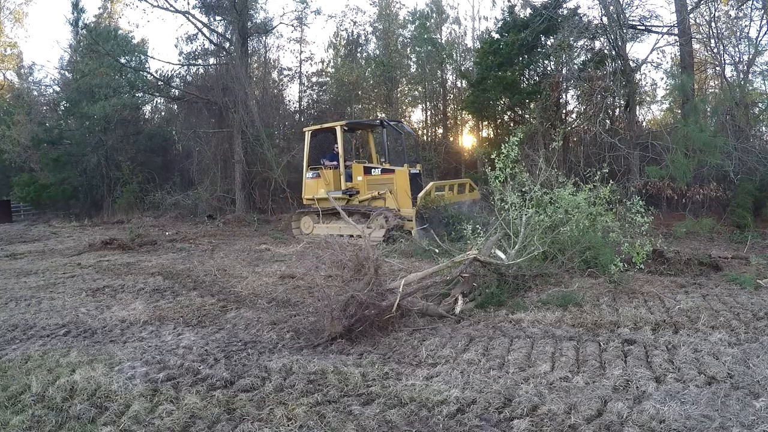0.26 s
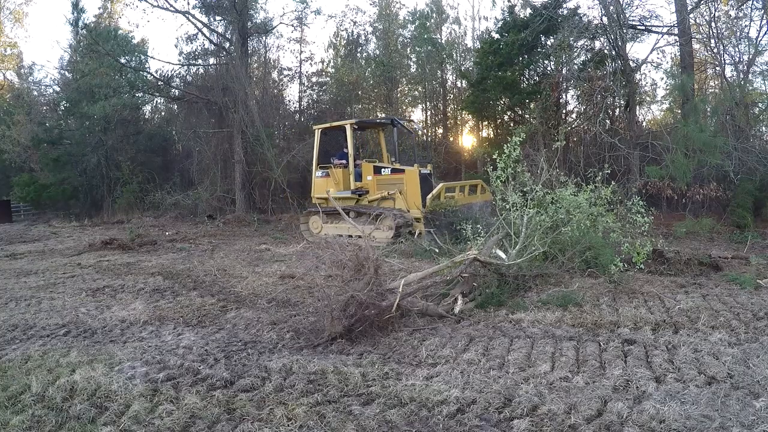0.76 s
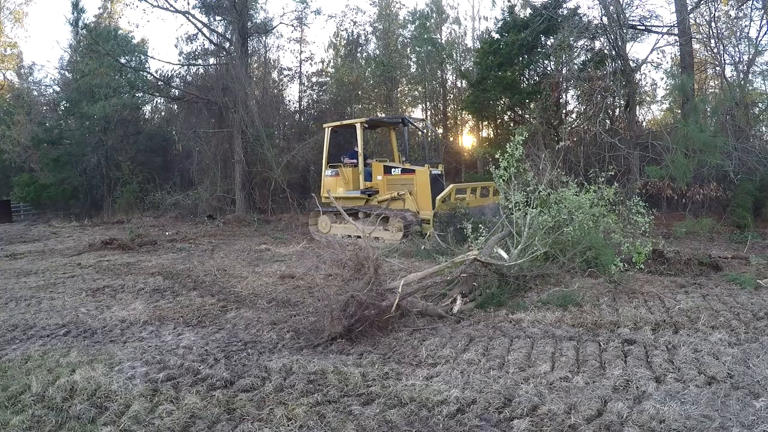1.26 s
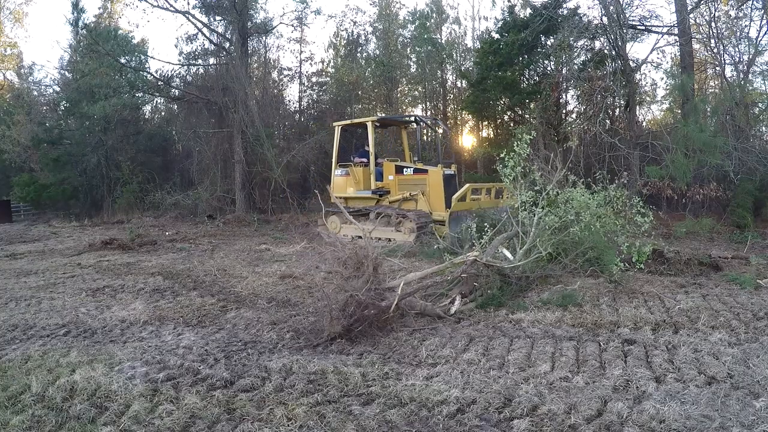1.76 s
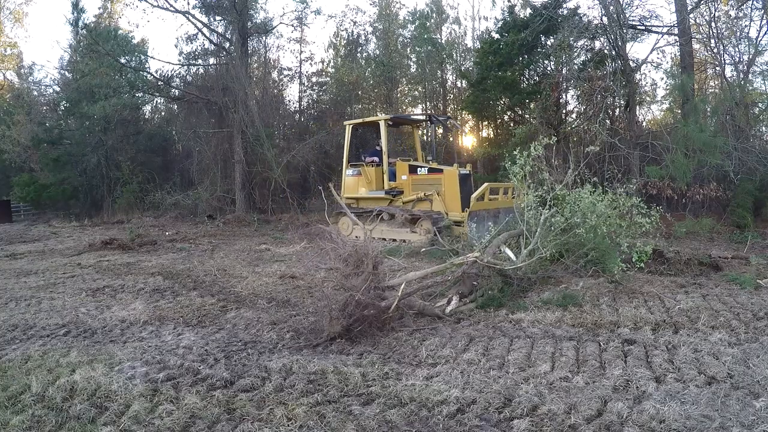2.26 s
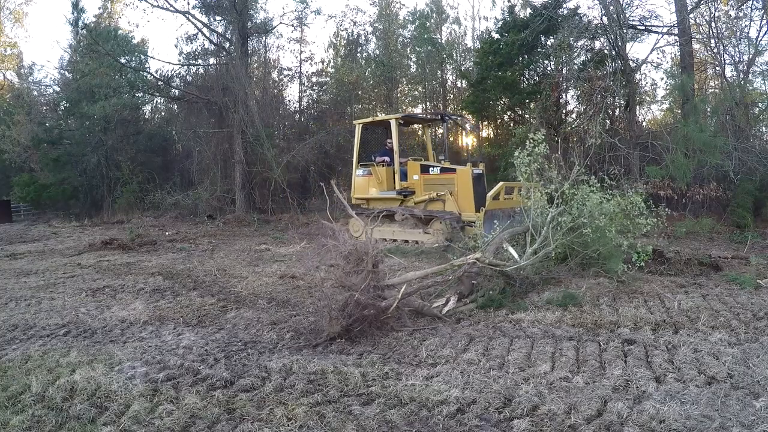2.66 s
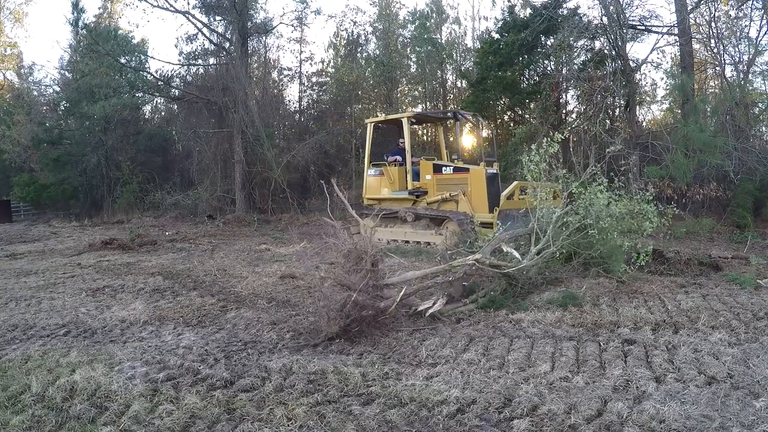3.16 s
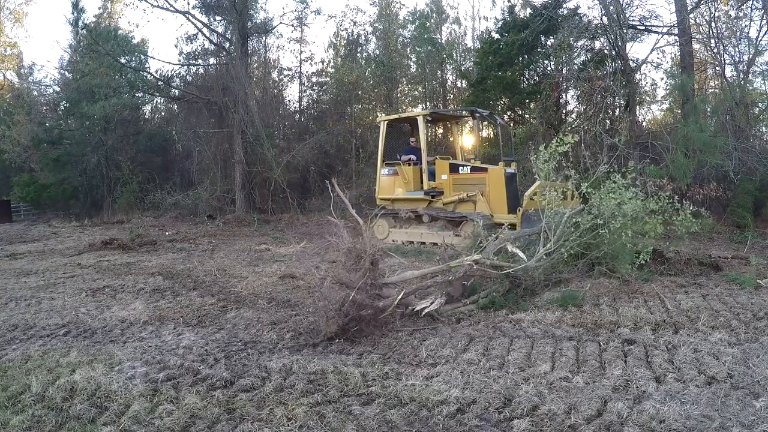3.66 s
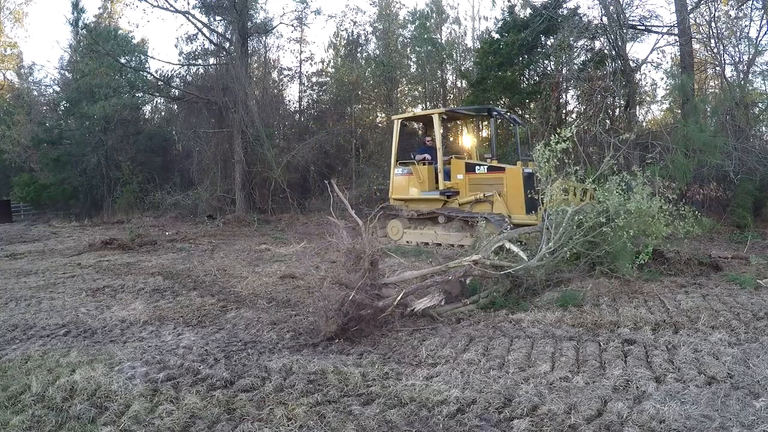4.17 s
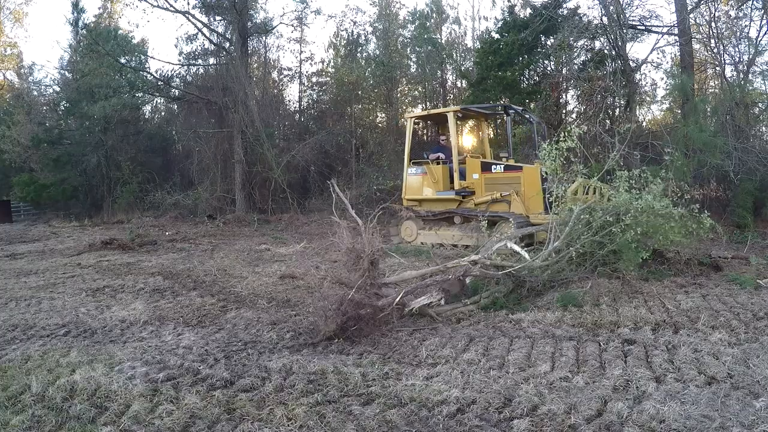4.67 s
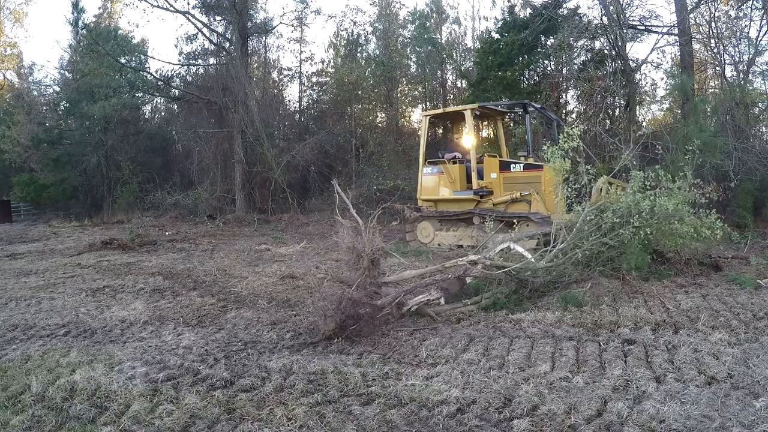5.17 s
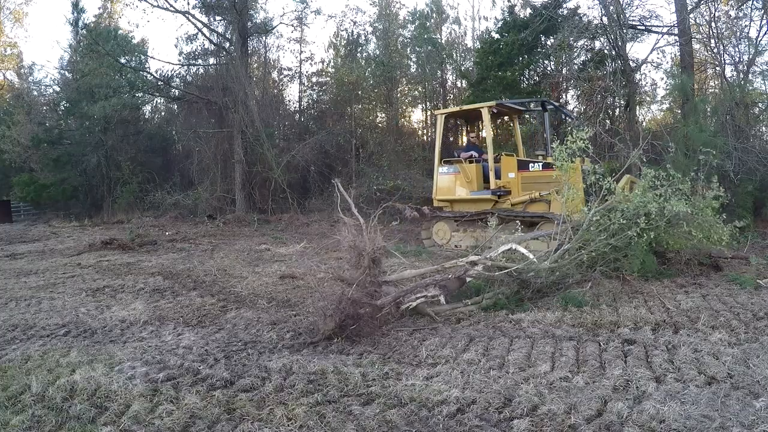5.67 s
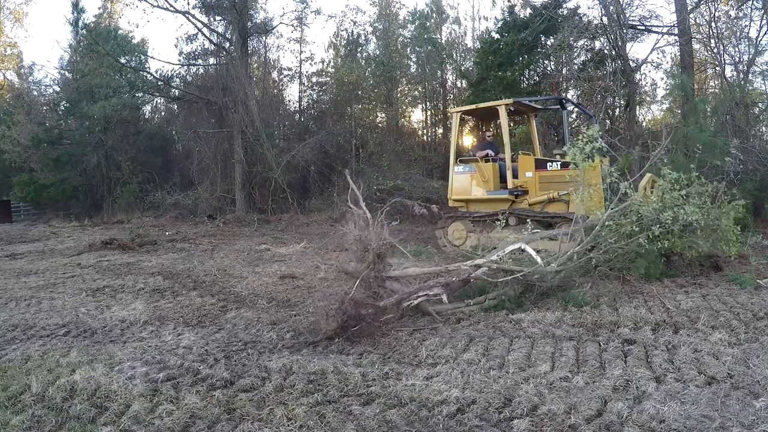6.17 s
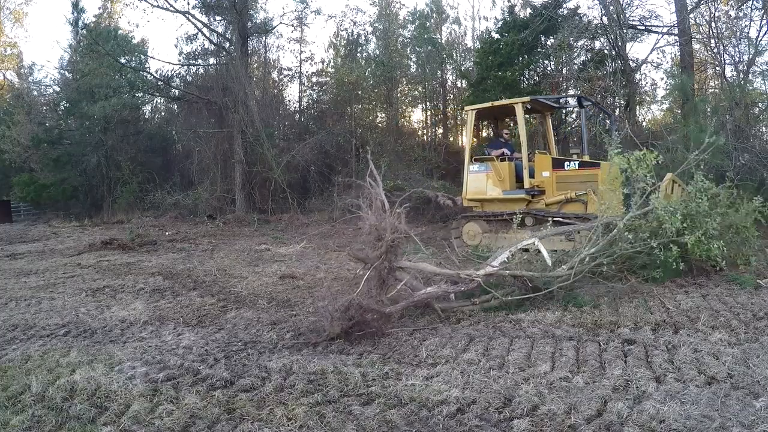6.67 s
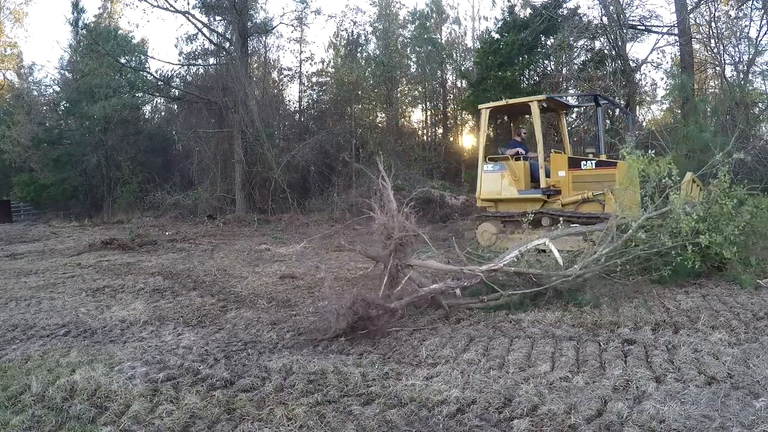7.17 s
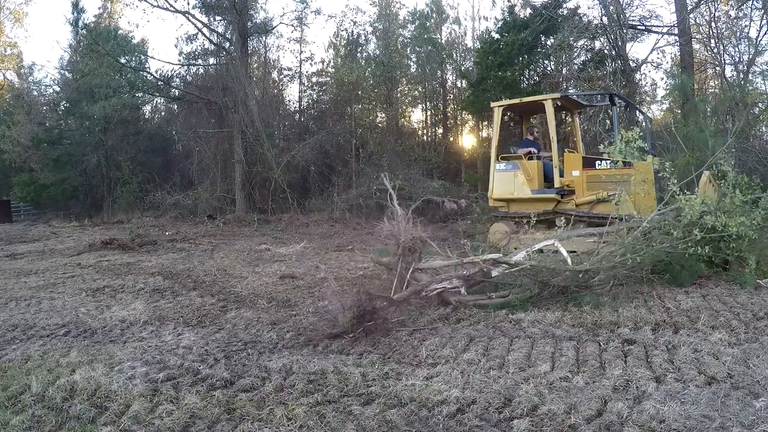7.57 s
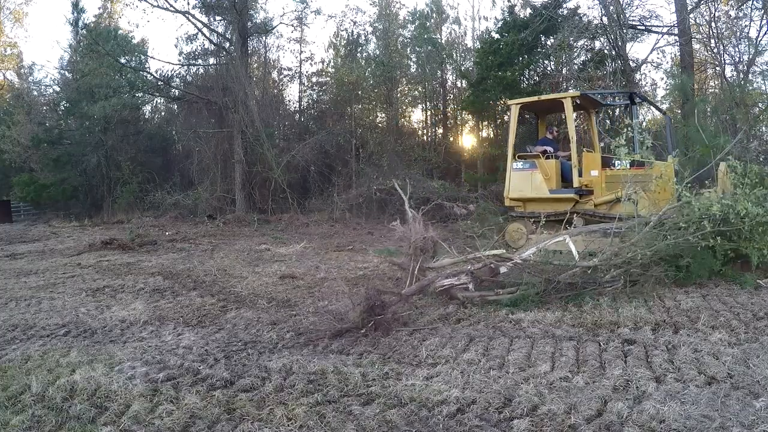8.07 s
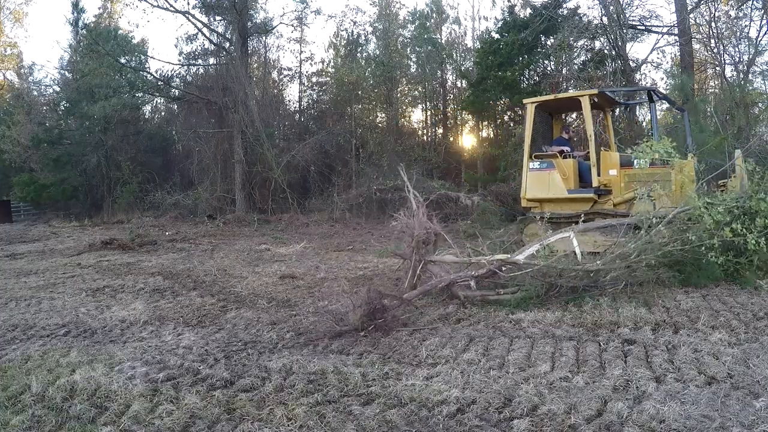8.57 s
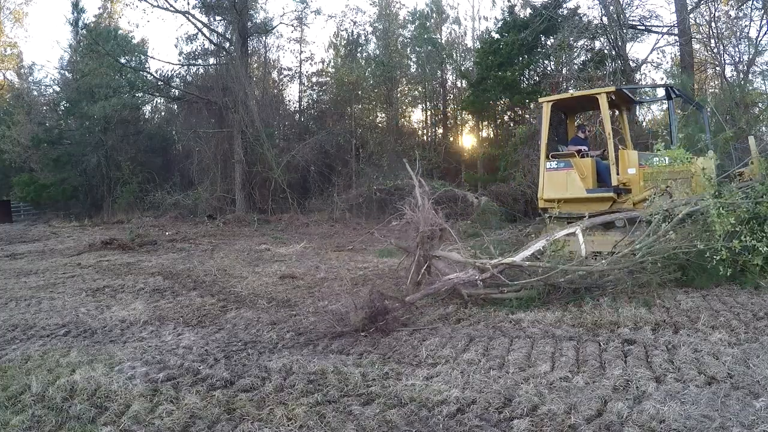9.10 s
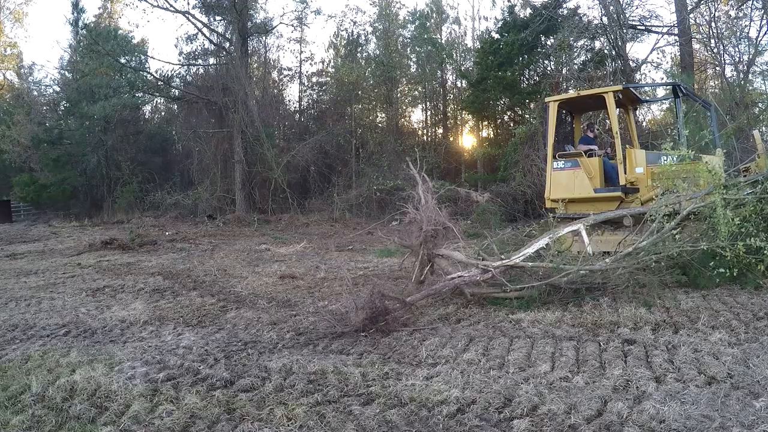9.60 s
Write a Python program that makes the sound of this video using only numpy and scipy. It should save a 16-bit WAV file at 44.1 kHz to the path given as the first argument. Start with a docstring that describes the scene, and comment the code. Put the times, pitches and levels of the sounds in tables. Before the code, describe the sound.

A heavy tracked machine drones continuously, its engine barely sagging under load. As it turns from front to side, the clatter gets brighter and more open, and thin whines swell and fade. Small twigs snap around two seconds, a trunk thuds against the blade midway, and thicker branches split near the end. Stationary outdoor microphone, open air, faint high hiss behind, no obvious reverberation.

```python
"""The exhaust of a six-cylinder diesel crawler dozer drones at its firing rate, at high revs, with a fan beside it.
The block clatters, a pattern of strikes mixed with noise; pumps, gears and panels sing in step with the shaft.
The machine slowly turns from front to side, which changes its colour and sweeps its beamed tones past the listener.
It pushes a small uprooted tree: bursts of coloured noise make the twigs snap and the trunk knock on the blade.
A track squeaks once, a brief tone of falling pitch, and a thin high hiss lies behind it all."""
import sys
import numpy as np
from scipy.fft import rfft, irfft, next_fast_len
from scipy.io import wavfile
from scipy.ndimage import map_coordinates

SR = 44100
rng = np.random.default_rng(int(sys.argv[2]) if len(sys.argv) > 2 else 0)


def to_wav(s):
    """Save 16-bit WAV."""
    ch = np.atleast_2d(s).T  # columns
    pcm = np.round(np.clip(ch, -1, 1) * 32767)  # PCM
    wavfile.write(sys.argv[1], SR, pcm.astype(np.int16))


N = 433944  # length in samples

# breaking wood: the crack of a twig, then its bright splinters
# Each row: frequency in Hz, relative level per hertz in dB
CRACK_SPECTRUM = [(1200, -16), (2500, -3), (3300, 6), (5000, -1.5), (8000, -11), (10000, -26), (15000, -48)]
SPLINTER_SPECTRUM = [(5000, -20), (9000, -10), (12500, 0), (15000, -1)]


def amp(db):
    """Turn decibels into gain."""
    return 10 ** (np.asarray(db) / 20)


def unit(x):
    """Scale a sound to rms 1."""
    return x / np.sqrt(np.mean(x ** 2) + 1e-20)


def curves(rows):
    """Draw straight lines between rows: one value per sample for each column after the time."""
    seconds, *columns = np.transpose(rows)
    return [np.interp(np.arange(N) / SR, seconds, column) for column in columns]


def wobble(rate):
    """A smooth random curve through `rate` random points a second."""
    points = rng.standard_normal(int(N * rate / SR) + 4)
    return map_coordinates(points, [np.arange(N) * rate / SR])


def filtered(x, response):
    """Multiply each frequency of x by the gain that response(hz) gives."""
    size = next_fast_len(N + 8192)
    spectrum = rfft(x, size) * response(np.fft.rfftfreq(size, 1 / SR))
    return irfft(spectrum, size)[:N]


def coloured(x, spectrum):
    """Give x a spectrum that falls away past its ends, at rms 1."""
    f, db = np.transpose(spectrum)

    def gain(hz):
        low_skirt = np.minimum(hz / f[0], 1) ** 2
        high_skirt = np.minimum(f[-1] / (hz + 1), 1) ** 6
        return amp(np.interp(np.log(hz + 1), np.log(f), db)) * low_skirt * high_skirt

    return unit(filtered(x, gain))


def heading():
    """The angle between the machine's nose and the listener grows steadily (degrees, per sample)."""
    start_deg, turn_deg_per_s = 30, 6
    return start_deg + turn_deg_per_s * np.arange(N) / SR


def by_view(values):
    """Glide through the values for front, corner and side as the machine turns."""
    # the angles at which the front, the corner and the side are seen
    # Three values: angle in degrees for each view
    view_deg = (35, 53.7, 90)
    return np.interp(heading(), view_deg, values)


def beam(facing_deg, width_deg, db):
    """Level (dB) of a beamed tone: loudest while it faces the listener."""
    edge_db, steepness = 4.5, 3.5  # loss at the half width; power of the angle by which it grows
    # every 100th sample is enough for so slow a turn
    off = np.abs(heading()[::100] - facing_deg) / width_deg
    level_db = db - np.minimum(edge_db * off ** steepness, 60)
    return np.interp(np.arange(N), np.arange(N)[::100], level_db)


def lobes(table):
    """Level (dB) of each order of a table: its strongest beam at every moment."""
    orders = sorted({row["order"] for row in table})
    return [(order, np.max([beam(*row["aim"]) for row in table if row["order"] == order], axis=0))
            for order in orders]


def tone(cycle, order, db, flutter_db, flutter_rate, drift):
    """One multiple of the engine cycle; moving air and ground echoes shake its level and phase."""
    # drift scales the random phase shake, in radians
    phase = 2 * np.pi * (order * cycle + rng.random()) + drift * wobble(flutter_rate)
    return np.sqrt(2) * amp(db + flutter_db * wobble(flutter_rate)) * np.sin(phase)


def exhaust(cycle, lope=0.19, sway=0.002):
    """The firing tone, with the side tones of unequal cylinders, and the fan."""
    # the firing tone before its lope and flutter
    # Each row: time in seconds, level in dB
    firing_level = [(0.1, -16.5), (0.66, -17), (3.49, -16), (4.08, -16.5), (5.47, -15.5), (9.75, -16)]
    # tones at one and a half and two times the firing rate; the second is 3 dB weaker
    # Three values: level in dB from front, corner and side, before flutter
    upper_level = (-37.5, -37, -30.5)
    # tones of the unequal cylinders, around which they flutter
    # First list: multiple of the two-turn engine cycle; second list: level in dB
    hum_orders, hum_db = (2, 3, 4, 11, 13, 21, 39), [-42, -45.5, -36.5, -47, -44.5, -45.5, -41.5]
    # shaft and blade rates of the belt-driven fan
    # First list: multiple of the engine cycle; second list: level in dB before flutter
    fan_orders, fan_db = (1.785, 3.57, 7.15, 10.72), [-40, -45, -45, -36.5]

    firing_db = curves(firing_level)[0]
    upper_db = by_view(upper_level)
    # strong and weak cylinders make the drone swell and hurry once a cycle
    beat = np.cos(2 * np.pi * cycle)
    drone = tone(cycle + sway * beat, order=6, db=firing_db, flutter_db=0.17, flutter_rate=6, drift=0.01)
    drone *= 1 + lope * beat
    drone += tone(cycle, order=9, db=upper_db, flutter_db=0.5, flutter_rate=2.2, drift=0.1)
    drone += tone(cycle, order=12, db=upper_db - 3, flutter_db=0, flutter_rate=4, drift=0.1)
    hum = sum(tone(cycle, order, db, flutter_db=1, flutter_rate=1.95, drift=0.071)
              for order, db in zip(hum_orders, hum_db))
    fan = sum(tone(cycle, order, db, flutter_db=1.3, flutter_rate=3, drift=0.29)
              for order, db in zip(fan_orders, fan_db))
    return drone + hum + fan


def repeating(cycle, size=2250, count=7):
    """Valves and injectors strike the same pattern every cycle; it changes slowly as the machine moves."""
    where = cycle % 1 * size
    place = np.linspace(0, count - 1, N)
    out = np.zeros(N)
    for k in range(count):
        near = np.abs(place - k) < 1
        pattern = map_coordinates(rng.standard_normal(size), [where[near]], mode="grid-wrap")
        # each pattern fades into the next
        out[near] += np.cos(np.pi / 2 * (place[near] - k)) * pattern
    return unit(out)


def clatter(cycle, locked=0.42, locked_hz=3800, firing_db=0.3, lope_db=0.4, knock_db=0.83):
    """Repeating strikes plus loose rattle and fan rush, both pulsing with the cylinders."""
    # the engine's colour seen from the front, the corner and the side
    # Each row: frequency in Hz, relative level per hertz in dB
    front = [(60, -1), (150, 0), (260, -1), (480, -7.5), (750, -1.5), (1080, -1.5), (1420, -5.5),
             (1700, -10.5), (2650, -6.5), (4100, -10), (5600, -17.5), (7200, -25.5), (8800, -39),
             (10300, -47)]
    corner = [(60, -5), (150, 0.5), (260, 1), (480, -3), (750, 0.5), (1080, -1.5), (1420, -5), (1700, -4.5),
              (2650, -6), (4100, -10), (5600, -17), (7200, -20.5), (8800, -33.5), (10300, -56)]
    side_on = [(60, -8), (150, -1.5), (260, -4), (480, 0.2), (750, -1), (1080, -1.5), (1420, -0.5),
               (1700, -5.5), (2650, -2.5), (4100, -9.5), (5600, -13), (7200, -19), (8800, -25),
               (10300, -38.5)]
    # loudness of the clatter
    # Three values: level in dB from front, corner and side
    clatter_level = (-24.5, -23, -23)

    def share(hz):
        """Part of the power that repeats every cycle: most in the middle of the range."""
        return locked / (1 + (hz / locked_hz) ** 4) * hz ** 2 / (hz ** 2 + 350 ** 2)

    source = filtered(repeating(cycle), lambda hz: np.sqrt(share(hz)))
    source += filtered(rng.standard_normal(N), lambda hz: np.sqrt(1 - share(hz)))
    # a fixed uneven pattern of loudness within each cycle
    strokes = map_coordinates(rng.standard_normal(40), [cycle % 1 * 40], mode="grid-wrap")
    pulse_db = firing_db * np.cos(2 * np.pi * 6 * cycle)
    pulse_db += lope_db * np.cos(2 * np.pi * cycle)
    pulse_db += knock_db * strokes + 0.22 * wobble(14)
    source *= amp(pulse_db)
    # turning shows the front, then the corner, then the open side of the engine
    turning = sum(by_view(seen) * coloured(source, colour)
                  for seen, colour in zip(np.eye(3), (front, corner, side_on)))
    return amp(by_view(clatter_level)) * unit(turning)


def whine(cycle, gear_swell_db=1.2):
    """Pumps and gears sing in step with the crankshaft; one pump tone throbs and the gear tones swell and fade."""
    # beams of hydraulic whine
    # Each row: order as a multiple of the engine cycle, aim = (facing in degrees, half width in degrees,
    # level in dB before flutter)
    pump_beams = [ dict(order=36, aim=(34.3, 7.6, -30)), dict(order=36, aim=(50, 8, -36)),
                  dict(order=36, aim=(71, 14, -29.5)), dict(order=69, aim=(35.1, 4, -30)),
                  dict(order=69, aim=(75.5, 3.1, -37.5)), dict(order=69, aim=(88, 2, -36.5))]
    # timing gears, overtones of a mesh with 52 teeth a cycle, thrown by the gear case in several lobes
    # Each row: order as a multiple of the engine cycle, aim = (facing in degrees, half width in degrees,
    # level in dB before swell and flutter)
    gear_beams = [ dict(order=104, aim=(66, 11.5, -38)), dict(order=156, aim=(30.5, 1.9, -34)),
                  dict(order=156, aim=(40, 2.7, -34)), dict(order=156, aim=(51, 6.7, -35.5)),
                  dict(order=156, aim=(66.5, 8, -35)), dict(order=156, aim=(80.3, 1.1, -34.5)),
                  dict(order=208, aim=(47.2, 3, -36.5)), dict(order=208, aim=(69, 21, -42))]
    # the pump tone that throbs once a cycle
    # One row: order as a multiple of the engine cycle, aim = (facing in degrees, half width in degrees,
    # level in dB before throb and flutter)
    throb_beam = dict(order=71, aim=(52, 12.5, -32.5))
    throb_spill_db, gear_spill_db = -42, -45.5  # lowest levels outside the beams, before flutter
    throb_depth = 0.72

    pumps = sum(tone(cycle, order, db, flutter_db=0.3, flutter_rate=11, drift=0.19)
                for order, db in lobes(pump_beams))
    throb_db = np.maximum(beam(*throb_beam["aim"]), throb_spill_db)
    throbbing = tone(cycle, throb_beam["order"], throb_db, flutter_db=0.8, flutter_rate=11, drift=0.17)
    throbbing *= 1 + throb_depth * np.cos(2 * np.pi * cycle)
    gears = np.zeros(N)
    for order, db in lobes(gear_beams):
        level_db = np.maximum(db, gear_spill_db) + gear_swell_db * wobble(4)
        gears += tone(cycle, order, level_db, flutter_db=1.8, flutter_rate=38, drift=0.29)
    return pumps + throbbing + gears


def panels(cycle):
    """Each panel radiates its tone in a beam, heard only while it faces the listener."""
    # the loudest ringing panels
    # Each row: order as a multiple of the engine cycle, aim = (facing in degrees, half width in degrees,
    # level in dB before flutter)
    loud_panels = [ dict(order=18, aim=(56, 25.6, -38.5)), dict(order=30, aim=(69, 11, -40)),
                   dict(order=39, aim=(87, 7, -37)), dict(order=48, aim=(57, 6.7, -37)),
                   dict(order=51, aim=(38.5, 11, -40)), dict(order=57, aim=(69, 10, -38)),
                   dict(order=58, aim=(31.5, 7.5, -37.5)), dict(order=60, aim=(51, 7.2, -35.5)),
                   dict(order=60, aim=(90, 2.5, -39)), dict(order=68, aim=(80.7, 6.5, -38.5)),
                   dict(order=72, aim=(77, 14, -41)), dict(order=75, aim=(84, 15, -37)),
                   dict(order=87, aim=(88, 1.7, -36)), dict(order=120, aim=(63, 4.1, -41)),
                   dict(order=131, aim=(76, 5, -37.5)), dict(order=132, aim=(40, 12, -42.5)),
                   dict(order=138, aim=(53, 6.3, -43.5)), dict(order=162, aim=(88.5, 2, -42)),
                   dict(order=171, aim=(40, 9, -45.5)), dict(order=180, aim=(66, 5.5, -43)),
                   dict(order=260, aim=(41, 7.4, -49))]
    # smaller panels ring on every third multiple and face any way
    small_orders = range(33, 175, 3)
    small_db, small_db_per_octave, small_width_deg = -44.5, -2, 9.1  # level is that of the lowest order

    facings = rng.uniform(heading().min(), heading().max(), len(small_orders))
    small_panels = []
    for order, facing in zip(small_orders, facings):
        level_db = small_db + small_db_per_octave * np.log2(order / small_orders[0])
        small_panels.append(dict(order=order, aim=(facing, small_width_deg, level_db)))
    shake, drift = amp(1.36 * wobble(14)), 0.28 * wobble(12)
    out = np.zeros(N)
    for panel in loud_panels + small_panels:
        db = beam(*panel["aim"])
        on = np.flatnonzero(db > -70)  # skip the samples where it is too weak to matter
        own = (on + rng.integers(N)) % N  # every panel flutters in its own way
        phase = 2 * np.pi * (panel["order"] * cycle[on] + rng.random()) + drift[own]
        out[on] += amp(db[on]) * shake[own] * np.sin(phase)
    return np.sqrt(2) * out


def bursts(times, levels_db, t60, attack):
    """An envelope of blows that rise fast and die away by 60 dB in t60 seconds."""
    out = np.zeros(N + SR)
    t = np.arange(SR // 4) / SR
    for start, db in zip(times, levels_db):
        blow = amp(db - 60 * t / t60) * (1 - np.exp(-t / attack))
        out[round(start * SR):][:len(t)] += blow
    return out[:N]


def brush():
    """Twigs snap and the thick ones split, over a fine crackle of dry branches; the trunk knocks on the blade."""
    # breaking twigs
    # Each row: start in seconds, strength in dB (each layer below shifts it), thickness from 0 to 1
    twigs = [(1.1544, -26, 0), (2.0338, -27, .1), (2.2441, -27, 0), (2.3875, -22, 0.1), (2.4373, -26, 0),
             (2.4994, -25, 0), (5.7033, -24, .1), (6.5495, -27, 0), (6.7774, -21, 0.2), (7.1277, -22, .2),
             (7.896, -20, 0.5), (8.4194, -19, .8), (9.1791, -20, .1), (9.5219, -20.5, 0.4)]
    # dull knocks of wood against the blade
    # Each row: start in seconds, level in dB
    knock_rows = [(1.39, -22), (3.58, -17), (5.10, -22), (5.135, -26), (5.755, -23)]
    # the colour of the knocking trunk, then of splitting thick wood
    # Each row: frequency in Hz, relative level per hertz in dB
    trunk_spectrum = [(100, -25), (250, -4), (500, -4), (950, 2), (1500, -14), (4000, -32)]
    limb_spectrum = [(1500, -25), (2700, -8), (3300, 3), (4100, -7), (6000, -16), (9000, -37)]
    splinter_rel_db, thick_dulls_db = -19, 6  # thick wood throws fewer bright splinters
    split_rel_db, second_split_s, second_split_db = -0.5, 0.01, -7  # wood splits in two quick steps

    start, strength_db, thickness = np.transpose(twigs)
    cracks = bursts(start, strength_db - 2.5, t60=0.079, attack=0.00056)
    cracks *= coloured(rng.standard_normal(N), CRACK_SPECTRUM)

    splinter_db = strength_db + splinter_rel_db - thick_dulls_db * thickness
    splinters = bursts(start, splinter_db, t60=0.035, attack=0.0005)
    splinters *= coloured(rng.standard_normal(N), SPLINTER_SPECTRUM)

    # the thicker the wood, the louder the split
    split_db = strength_db + split_rel_db + 20 * np.log10(thickness + 1e-6)
    split_times = np.r_[start, start + second_split_s]
    split_levels_db = np.r_[split_db, split_db + second_split_db]
    splits = bursts(split_times, split_levels_db, t60=0.061, attack=0.001)
    splits *= coloured(rng.standard_normal(N), limb_spectrum)

    # the crackle grows denser as brush piles up before the blade
    when, strength = rng.random((130, 2)).T
    crackle = bursts(np.sqrt(when) * N / SR, 12 * strength ** 2, t60=0.022, attack=0.0003)
    crackle_noise = amp(-39) * coloured(rng.standard_normal(N), CRACK_SPECTRUM)
    crackle_noise += amp(-54) * coloured(rng.standard_normal(N), SPLINTER_SPECTRUM)
    crackle *= crackle_noise

    knocks = bursts(*np.transpose(knock_rows), t60=0.1, attack=0.002)
    knocks *= coloured(rng.standard_normal(N), trunk_spectrum)
    return cracks + splinters + splits + crackle + knocks


def track_squeak():
    """A dry track pin sticks and slips, its pitch sagging as it lets go."""
    loudest_s, half_length_s, peak_db = 1.733, 0.014, -26.5
    start_hz, sag_hz_per_s = 4950, 24000  # the pitch sags after the loudest moment
    t = np.arange(N) / SR - loudest_s
    hz = start_hz - sag_hz_per_s * np.maximum(t, 0)
    hz *= 1 + 0.013 * wobble(400)  # rough, unsteady pitch
    envelope = np.exp(-(t / half_length_s) ** 2)
    return amp(peak_db) * envelope * np.sin(2 * np.pi * np.cumsum(hz) / SR)


def hiss():
    """A thin high hiss of coloured noise that grows as the machine turns from its front."""
    # loudness of the hiss
    # Three values: level in dB from front, corner and side
    hiss_level = (-57, -54.5, -55)
    spectrum = [(6000, -2), (10300, -3.5), (11800, 1), (15300, 0)]  # Hz, relative dB per hertz
    return amp(by_view(hiss_level)) * coloured(rng.standard_normal(N), spectrum)


def scene():
    """Six firings make one engine cycle, which times the engine and all that sings with it."""
    # engine speed under load
    # Each row: time in seconds, firings a second
    speed = [(0.0, 117.74), (0.7, 119.22), (1.15, 119.04), (1.4, 117.98), (1.7, 118.24), (1.95, 117.36),
             (3.0, 117.96), (3.52, 116.52), (4.1, 117.77), (4.5, 117.26), (4.68, 116.29), (5.0, 116.33),
             (5.15, 116.94), (6.5, 117.08), (7.3, 115.59), (7.85, 116.12), (8.0, 117.23), (9.25, 117.03),
             (9.45, 119.27), (9.84, 119.88)]
    cycle = np.cumsum(curves(speed)[0]) / SR / 6  # engine cycles so far
    machine = exhaust(cycle) + clatter(cycle) + whine(cycle) + panels(cycle)
    return (machine + brush() + track_squeak() + hiss())[None]


def record(dry):
    """Nothing is heard above a sharp upper limit of 15300 Hz."""
    return filtered(dry[0], lambda hz: hz < 15300)[None]


dry = scene()
out = record(dry)
to_wav(out)
```